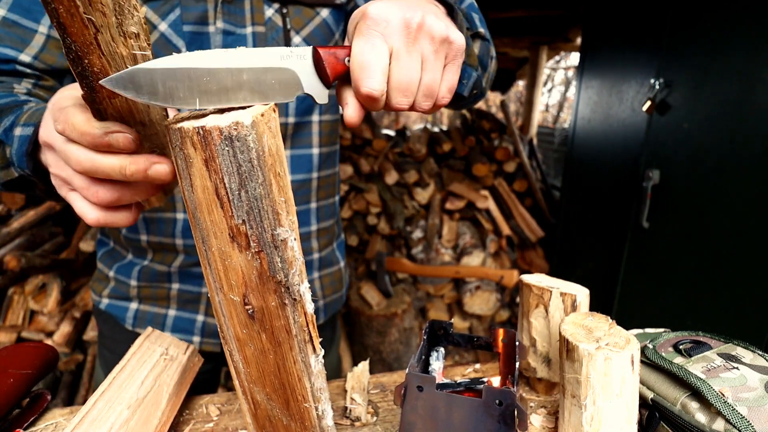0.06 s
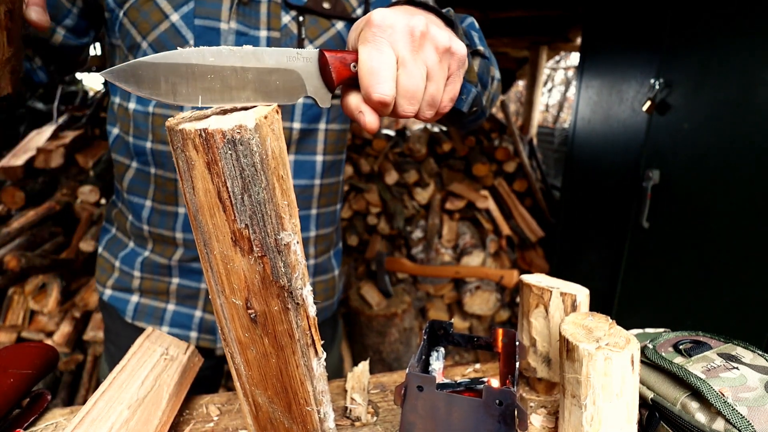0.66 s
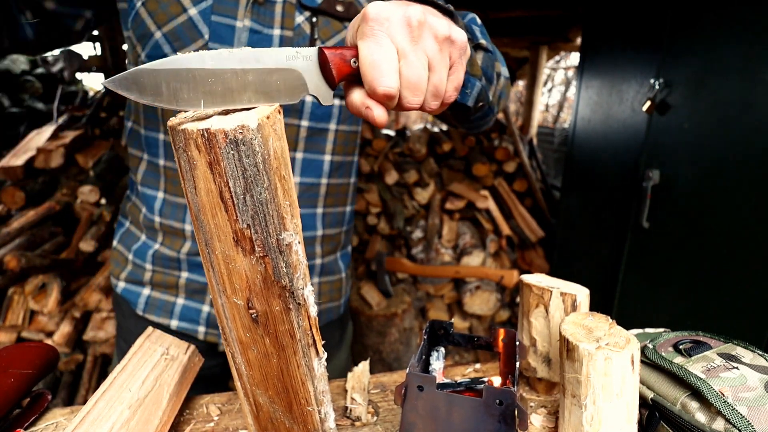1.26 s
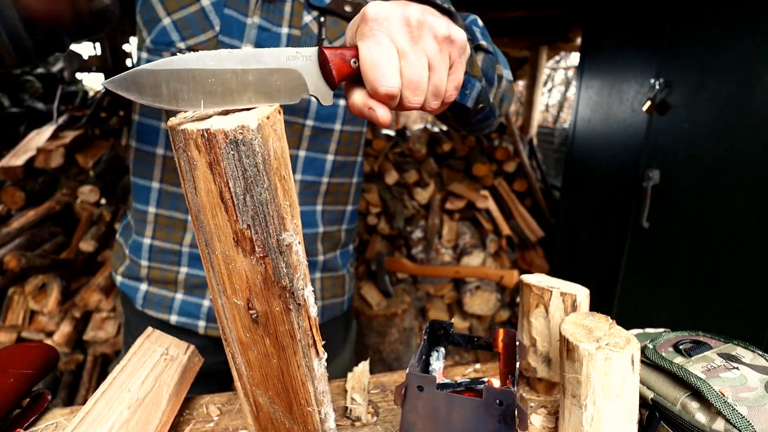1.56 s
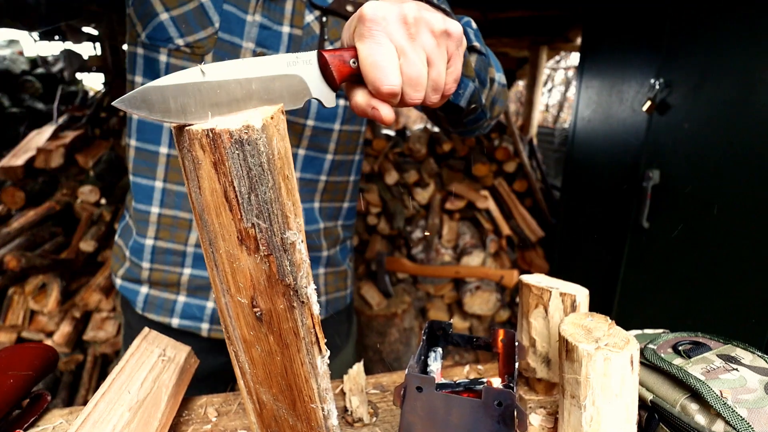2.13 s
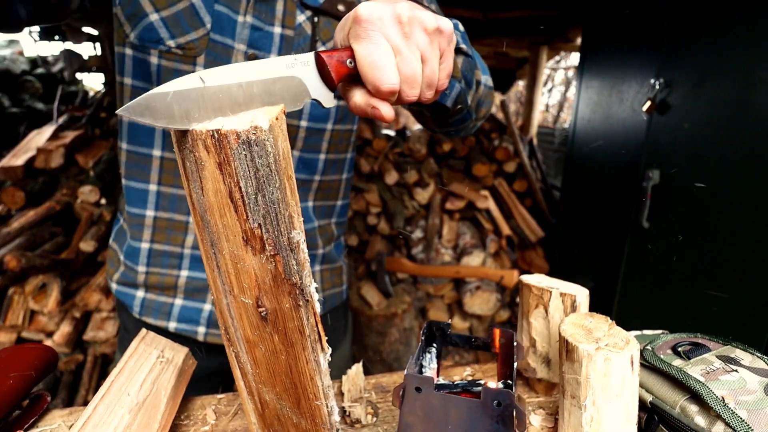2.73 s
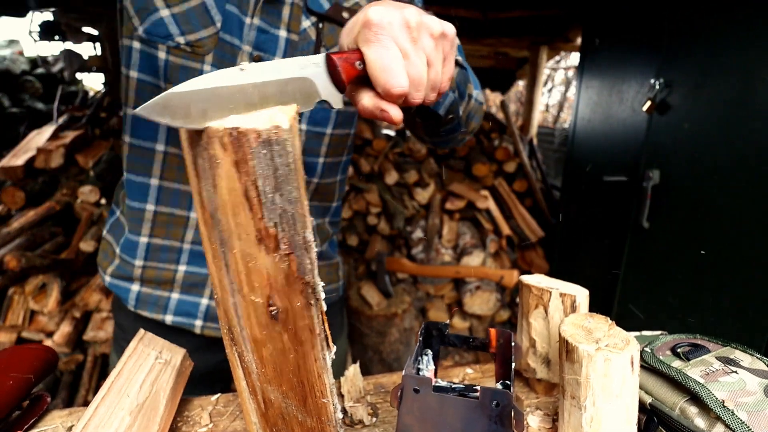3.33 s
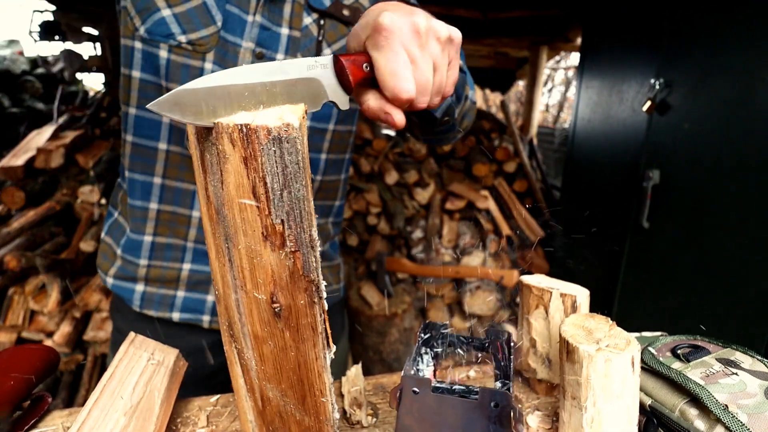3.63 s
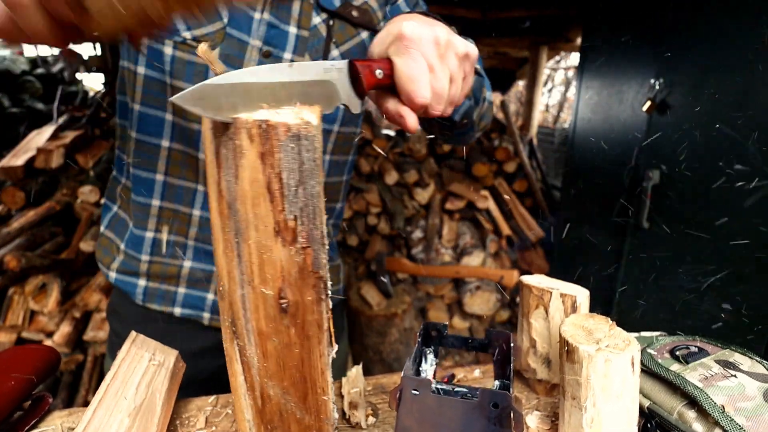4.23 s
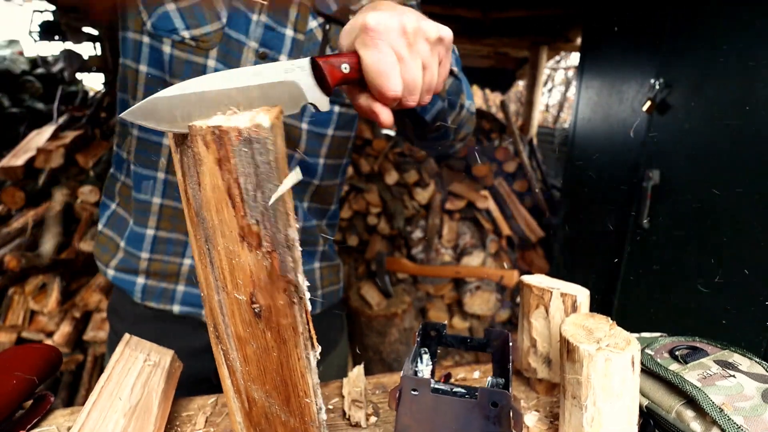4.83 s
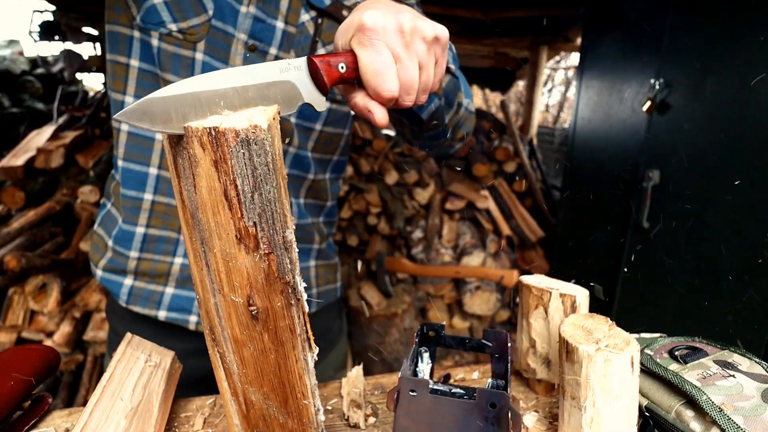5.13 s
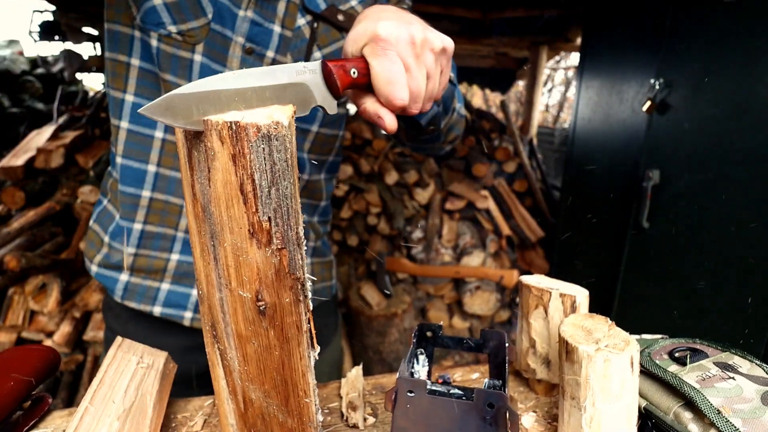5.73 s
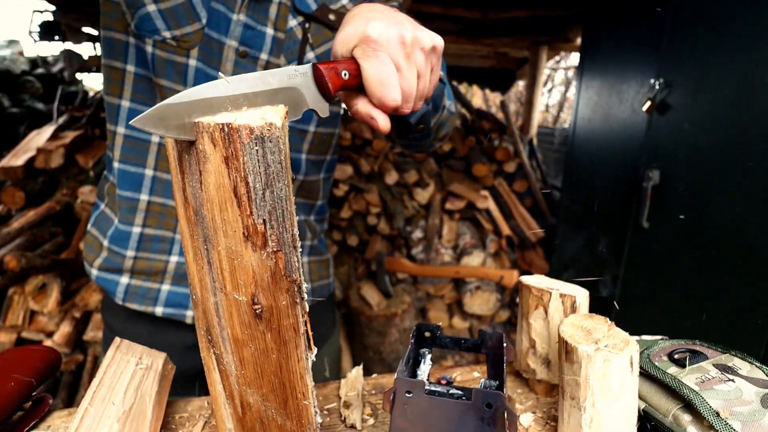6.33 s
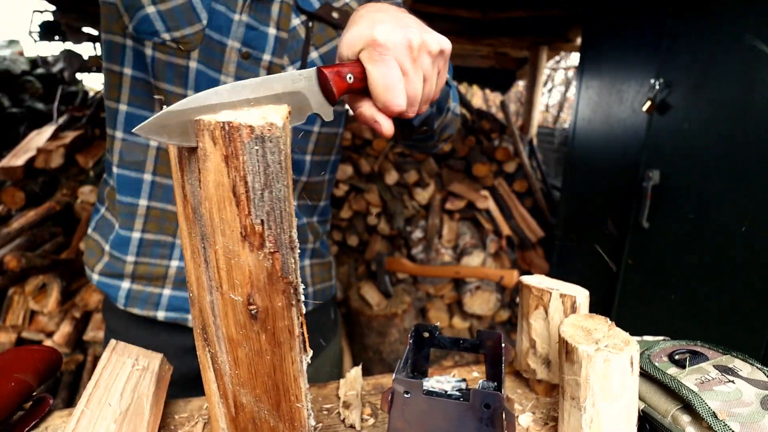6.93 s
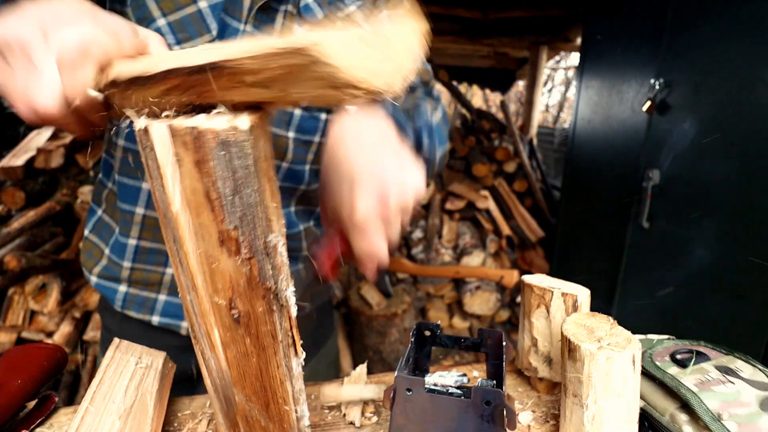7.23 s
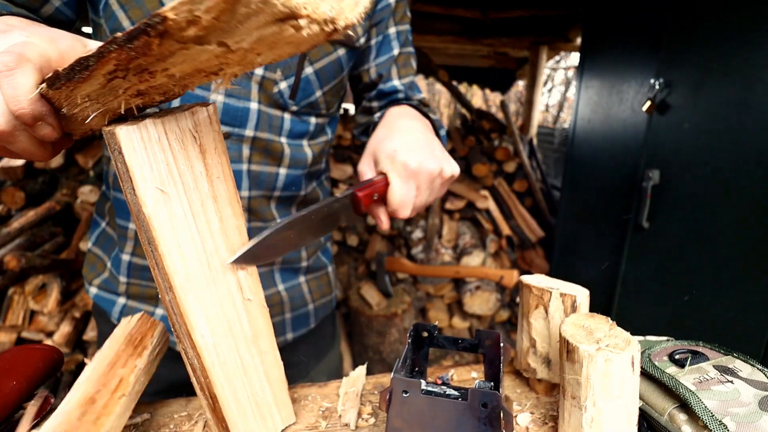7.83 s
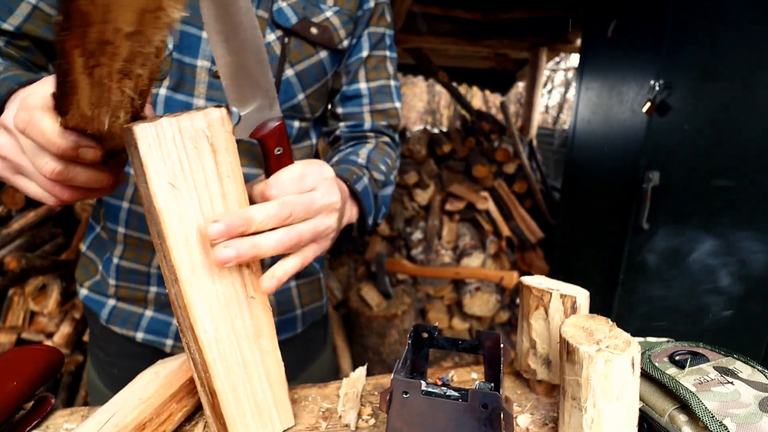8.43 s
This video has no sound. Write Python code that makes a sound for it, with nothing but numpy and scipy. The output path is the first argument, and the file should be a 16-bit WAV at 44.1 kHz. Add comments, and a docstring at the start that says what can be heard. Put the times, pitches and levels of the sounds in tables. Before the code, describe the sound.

Close to a chopping block, rain hisses and ticks, with crackles and brief sizzles from a small stove. Ten hard, slightly distorted blows of a wooden baton drive a knife into an upright log, a little over half a second apart, and the rain dips under them. After the last, fibres snap, the blade scrapes free, and a split half knocks about and lands with a thud.

```python
"""Outdoors at a chopping block beside a small stove, in steady rain; one microphone, close to the block.
A wooden baton drives a knife through an upright log in ten blows. Each swing pushes a puff of air ahead
of it; the blow rings log and blade, overloads the microphone and makes the gain control duck the rain.
The stove crackles and drops sizzle on it. The log splits with a few snaps over a soft, short hiss;
one half topples, knocks about and lands on the block."""
import sys
import numpy as np
from scipy import signal
from scipy.io import wavfile
from scipy.ndimage import minimum_filter1d

SR = 44100
rng = np.random.default_rng(int(sys.argv[2]) if len(sys.argv) > 2 else 0)


def pcm_store(signal):
    """Save signal as 16-bit PCM."""
    levels = np.round(np.clip(np.atleast_2d(signal), -1, 1) * 32767)
    wavfile.write(sys.argv[1], SR, levels.astype(np.int16).T)


N = 377937
RING_SIZE = SR // 2   # samples in one struck sound

# how loud the rain sounds, stepping down as the blows go on: (time [s], level [dB])
RAIN_LEVEL = [(0, -35), (2.05, -36.0), (2.7, -39), (4.6, -38.5), (5.2, -43), (6.4, -43.5), (7.1, -45.1),
              (8.57, -42.5)]
# colour of the far rain: (frequency [Hz], relative density [dB])
RAIN_COLOUR = [(30, -8), (60, -10), (100, -8), (174, -2.5), (260, -1.5), (430, 0.5), (720, -2.5),
               (1150, -2), (1800, -6.5), (3100, -7), (4300, -10), (7200, -9), (10500, -33.5),
               (15000, -27.5)]
# drops on the hot stove: (time [s], level [dB])
SIZZLES = [(0.083, -28), (0.37, -25.5), (0.846, -31), (3.628, -34), (4.394, -26)]
# the loudest crackles of stove and splinters: (time [s], snap and treble level [dB], mid level [dB])
CRACKLES = [(0.2017, -21, -33), (0.3175, -18.5, -25), (0.361, -21, -17.5), (0.5077, -17.5, -34),
            (0.781, -18.5, -37), (1.3082, -17.5, -20.5), (3.1958, -17, -27), (3.7329, -18.5, -20.5),
            (3.9758, -18, -47), (4.3206, -20, -39), (4.682, -20, -22), (7.666, -21, -35),
            (7.7968, -19.5, -50), (8.0147, -22.5, -22.5)]
# loose wood knocking: (time [s], body level [dB], clack level [dB])
KNOCKS = [(.668, -25.5, -28), (2.683, -29, -28.5), (4.132, -39, -21.5), (4.392, -32, -19.5),
          (7.3522, -19, -13), (7.4105, -20.5, -27), (7.4442, -34, -20), (7.7285, -10, -19),
          (7.738, -16, -20.5), (7.8455, -24, -34), (8.106, -25, -47), (8.2434, -21.5, -37),
          (8.2747, -9, -9.5), (8.2782, -16.5, -10.5), (8.336, -16.5, -25), (8.345, -16.5, -28.5),
          (8.5485, -30.5, -28)]
# low modes of a split half: (frequency [Hz], level [dB], t60 [s])
BODY_MODES = [(317, -4.5, 0.074), (496, -6, 0.029), (553, -8, 0.083), (650, -29, 0.034), (940, -16, 0.097),
              (1060, -5.5, 0.02), (1200, -6.5, 0.016)]
# high modes of a split half: (frequency [Hz], level [dB], t60 [s])
CLACK_MODES = [(1690, -14, .06), (1835, -2.5, 0.064), (2165, -5.5, 0.028), (2340, -12.5, 0.14),
               (2760, -27, 0.1), (3080, -19, 0.02), (3900, -25, 0.08)]
# the blade scrapes on wood: (time [s], level [dB], t60 [s])
SCRAPES = [(1.387, -25.5, 0.096), (4.394, -28, 0.29), (7.34, -29, .22), (8.225, -37.5, .4)]
# baton on the knife's spine: (time [s], force [dB], blade ring relative to force [dB], air puff [dB])
BLOWS = [(1.6913, 2, -1.5, -11.5), (2.3107, 3.5, 3.5, -5), (2.8817, 5.5, 4.5, -7), (3.459, 6, 0.5, -3),
         (4.1759, 7.5, -11, -3.5), (4.7926, 9, -7, -3), (5.4123, 8, 0, -5), (6.034, 10, -2, -4.5),
         (6.663, 8, 2.5, -9.5), (7.2613, 9, -2, -11)]
# the log standing on its block: (frequency [Hz], level [dB], t60 [s])
LOG_MODES = [(248, -18.5, 0.076), (286.4, -15.5, 0.23), (407.2, -8, 0.21), (481.7, -7, 0.14),
             (516, -12, 0.18), (587, -5, 0.054), (721, -11.5, 0.08), (834, -13, 0.12), (942, -12, 0.11),
             (1006, 1, 0.021)]
# the wedged blade, damped modes and a faint after-ring: (frequency [Hz], level [dB], t60 [s])
BLADE_MODES = [(1336, -14, 0.039), (1391, -17.5, 0.1), (1501, -9.5, 0.063), (1615, -6.5, 0.03),
               (1780, -39, 0.09), (2227, -18, 0.035), (1450, -37, 0.32), (1457, -29.5, 0.32),
               (1540, -38, 0.49), (1700, -34, 0.4), (1730, -38, 0.38)]
# scatter off the shelter and wood pile: (frequency [Hz], relative density [dB])
SCATTER_COLOUR = [(100, -4), (300, 3), (500, -0.5), (900, 1), (1500, -16), (2100, -9), (3500, -8.5),
                  (8000, -64), (16000, -62)]
# how long that scatter lasts: (frequency [Hz], t60 [s])
SCATTER_T60 = [(100, 0.16), (500, 0.27), (1000, 0.24), (1500, 0.54), (2500, 0.03), (8000, 0.015)]
# the baton rebounds on the knife: (time [s], level [dB])
REBOUNDS = [(2.3413, 15.5), (2.9049, 14)]
# the half lands on the block: (time [s], thud level [dB], rocking level [dB])
LANDINGS = [(8.2765, -2, -35), (8.294, -6, -16.5), (8.403, -37, -27)]
# thud of the block: (frequency [Hz], level [dB], t60 [s])
BLOCK_MODES = [(98, -17.5, 0.18), (190, -5, 0.15), (234, -23, .07)]
# rocking after the landing: (frequency [Hz], level [dB], t60 [s])
ROCKING_MODES = [(38.1, 1.5, 0.45), (64, 2.5, 0.12)]


def from_db(db):
    """Decibels to gain."""
    return 10 ** (np.asarray(db) / 20)


def unit_rms(x):
    """Scale to rms 1."""
    return x / np.sqrt(np.mean(x ** 2) + 1e-20)


def at_hz(points, hz):
    """Read a table on a log-frequency axis."""
    points = np.array(points)
    return np.interp(np.log(hz), np.log(points[:, 0]), points[:, 1])


def butter(x, hz, kind, order=2):
    """Butterworth filter."""
    return signal.sosfilt(signal.butter(order, np.clip(hz, 10, .45 * SR), kind, fs=SR, output="sos"), x)


def add(out, s, sound):
    """Mix a sound in at s seconds."""
    start = max(int(round(s * SR)), 0)
    out[start:start + len(sound)] += sound[:max(N - start, 0)]


def decay(t60):
    """An envelope that falls 60 dB in t60 seconds."""
    return from_db(-60 * np.arange(RING_SIZE) / SR / t60)


def drift(per_s):
    """Glide between random values, per_s of them a second."""
    return np.interp(np.arange(N) / SR * per_s, np.arange(2000), rng.standard_normal(2000))


def noise_bands(spectrum, size):
    """Half-octave noise bands under a spectrum, together rms 1, as (centre, signal) pairs."""
    edges = 25 * 2 ** np.arange(0, 9.6, .5)
    centres = np.sqrt(edges[1:] * edges[:-1])
    white = rng.standard_normal((2, size))
    bands = np.array([from_db(at_hz(spectrum, hz)) * butter(white[k % 2], edges[k:k + 2], "band")
                      for k, hz in enumerate(centres)])
    return zip(centres, bands / bands.sum(0).std())


def ring(modes, spread_db=0, detune=0):
    """Struck modes (Hz, dB, t60); the point of contact can vary their strengths and pitches."""
    t = np.arange(RING_SIZE) / SR
    chance = rng.standard_normal((len(modes), 2))
    return sum(from_db(db + spread_db * a) * decay(t60) * np.sin(2 * np.pi * hz * (1 + detune * b) * t)
               for (hz, db, t60), (a, b) in zip(modes, chance))


def grit(low_hz, high_hz, order=2):
    """A band of gritty noise, rms 1."""
    snaps = rng.standard_normal(RING_SIZE) * from_db(3.5 * rng.standard_normal(RING_SIZE))
    return unit_rms(butter(snaps, [low_hz, high_hz], "band", order))


def rain_db(s):
    """Base level of the rain at a time."""
    return np.interp(s, *np.transpose(RAIN_LEVEL))


def rain(drops_per_s=260, drops_db=-11):
    """A wash of far drops, with drops near the microphone ticking out of it."""
    wash = 0
    for hz, band in noise_bands(RAIN_COLOUR, N):
        lift = at_hz([(1000, from_db(4)), (5000, from_db(2.5))], hz)
        flutter = from_db(1.2 * drift(per_s=45))
        wash += band * flutter * lift
    hits = rng.random(N) < drops_per_s / SR
    sizes = from_db(2.55 * np.minimum(rng.exponential(1, N), 4.5))
    drops = hits * sizes * rng.choice([-1, 1], N)
    pitches = np.geomspace(700, 12000, num=12)
    pitch_index = rng.integers(0, len(pitches), N)
    near = 0
    for k, hz in enumerate(pitches):
        ticks = butter(drops * (pitch_index == k) + 1e-18, [hz / 1.2, hz * 1.05], "band", order=1)
        near += ticks / np.sqrt(hz / 1000)
    return from_db(rain_db(np.arange(N) / SR)) * (wash + from_db(drops_db) * unit_rms(near))


def sizzles():
    """Drops hiss away on the hot stove."""
    out = np.zeros(N)
    for s, db in SIZZLES:
        add(out, s, from_db(db) * grit(3200, 9700) * decay(.098))
    return out


def crackle(level_db, mid_db):
    """A sharp snap with a quick clump of smaller ones."""
    mids = from_db(mid_db - 7.5) * grit(1200, 3900)
    treble = from_db(level_db - 13) * grit(5450, 7560, order=1)
    snap = from_db(level_db - 7) * grit(2300, 6200, order=1)
    return (mids + treble) * decay(.078) + snap * decay(.019)


def crackles(small_per_s=2.5):
    """Stove and splinters crackle: a few loud ones, and small random ones that follow the rain's level."""
    out = np.zeros(N)
    for s, level_db, mid_db in CRACKLES:
        add(out, s, crackle(level_db, mid_db))
    for s in rng.uniform(0, N / SR, int(small_per_s * N / SR)):
        level_db = rain_db(s) + rng.uniform(7, 17)
        add(out, s, crackle(level_db, mid_db=level_db - 25))
    return out


def loose_wood(bounce_s=.021, bounce_db=-14):
    """Chips and the split half knock and bounce once; a harder contact has more clack and is brighter."""
    out = np.zeros(N)
    for s, body_db, clack_db in KNOCKS:
        body = ring(BODY_MODES, spread_db=1.5, detune=.012)
        body += from_db(-4.5) * grit(320, 646, order=3) * decay(.099)
        clack = ring(CLACK_MODES, spread_db=3, detune=.015)
        clack += from_db(-5) * grit(870, 6400, order=1) * decay(.057)
        contact_hz = 3540 * 2 ** ((clack_db - body_db) / 48)
        knock = -butter(from_db(body_db) * body + from_db(clack_db) * clack, contact_hz, "low", order=1)
        knock += from_db(clack_db - 17.5) * grit(3400, 12000, order=1) * decay(.016)   # first touch
        add(out, s, knock)
        add(out, s + bounce_s, from_db(bounce_db) * knock)
    return out


def scrapes():
    """Steel rubs on the wood as the knife is shifted or slips free."""
    out = np.zeros(N)
    for s, db, t60 in SCRAPES:
        add(out, s, from_db(db) * grit(1860, 3320) * decay(t60))
    return out


def air_puff(lead_s):
    """Air ahead of the baton: slight suction, a swell, and a quick collapse at contact, lead_s in."""
    t = np.arange(SR // 16) / SR - lead_s
    suction = np.exp(-.5 * ((t + .016) / .008) ** 2)
    swell = np.exp(-.5 * ((t + .0047) / .0031) ** 2)
    collapse = np.exp(-.5 * (t / .00016) ** 2)
    swish = butter(rng.standard_normal(len(t)), [300, 6000], "band", order=1)
    swish *= np.exp(-.5 * ((t + .0077) / .011) ** 2)
    return swell - .1 * suction - .8 * collapse + from_db(-23.5) * swish


def log_ring_db(blows_so_far):
    """As the split opens, the log rings more weakly with every blow."""
    return 2 - 1.7 * blows_so_far


def baton_crack(hz):
    """Wood on steel: fast-dying modes, the strongest near hz, and a burst of noise."""
    modes = [(hz, 17.5, .006), (235, -3, .016), (540, 7, .01),
             (860, 6, .008), (2800, 4, .005), (3700, 3, .004)]
    tone = ring(modes, spread_db=1.1, detune=.044)
    burst = butter(rng.standard_normal(RING_SIZE), 6100, "low") * decay(.0071)
    return tone + from_db(6.5) * burst


def blows(loose_blade_hz=2210, wedged_blade_hz=1215, puff_lead_s=.04):
    """The baton strikes, rebounding on two blows; log and blade ring, fibres tear, the shelter answers."""
    out = np.zeros(N)
    bump = ring([(520, 0, .0016)])   # a dull contact of about one cycle
    for k, (s, force_db, blade_db, puff_db) in enumerate(BLOWS):
        crack = baton_crack(wedged_blade_hz if k else loose_blade_hz)
        log = from_db(log_ring_db(k)) * ring(LOG_MODES, spread_db=1.5, detune=.004)
        blade = from_db(blade_db) * ring(BLADE_MODES, spread_db=2, detune=.012)
        fibres = grit(1960, 2760, order=3) * decay(.25)
        fibres += from_db(-8.5) * grit(3400, 6300, order=1) * decay(.76)
        scatter = sum(band * decay(at_hz(SCATTER_T60, hz))
                      for hz, band in noise_bands(SCATTER_COLOUR, RING_SIZE))
        bump_db = force_db + .5 * log_ring_db(k)
        add(out, s - puff_lead_s, from_db(puff_db) * air_puff(puff_lead_s))
        add(out, s, -from_db(force_db) * (crack + log + blade))   # starts with a rarefaction
        add(out, s + .00179, from_db(-36 + 1.07 * k) * fibres)   # each blow tears more
        add(out, s + .002975, from_db(bump_db - 12.5) * scatter)
        add(out, s + .00827, -from_db(bump_db) * bump)   # the log bottoms on the block
    for s, db in REBOUNDS:
        rebound = bump + from_db(-21.5) * ring(LOG_MODES + BLADE_MODES, spread_db=5.5)
        add(out, s, -from_db(db) * butter(rebound, 1440, "low"))
    return out


def low_shudder():
    """Every blow is followed by a rocking at a very low pitch."""
    out = np.zeros(N)
    fade = np.linspace(1, 0, RING_SIZE) ** .5
    for k, (s, _, _, puff_db) in enumerate(BLOWS):
        push = from_db(puff_db + .5 * log_ring_db(k))
        rocking = ring([(35.85, -18, 1.0)], spread_db=.5, detune=.0076) * fade
        rumble = from_db(-27) * grit(31, 80) * decay(.3)
        add(out, s + .0033, push * rocking)
        add(out, s + .125, push * rumble)
    return out


def last_fibres(s=7.2922, count=3, mean_gap_s=.02):
    """After the last blow, fibres snap at uneven gaps, each weaker, over a soft, short hiss."""
    out = np.zeros(N)
    add(out, s, from_db(-21) * grit(2200, 9000, order=1) * decay(.24))   # hiss fills the dip in the rain
    for k, gap in enumerate(mean_gap_s * rng.uniform(.5, 1.5, count)):
        snap = grit(2400, 8000, order=1) * decay(.018)
        add(out, s, from_db(-3.5 - 10 * k) * snap)
        s += gap
    return out


def landing():
    """The toppled half thuds onto the block and rocks."""
    out = np.zeros(N)
    for s, thud_db, rocking_db in LANDINGS:
        add(out, s, from_db(thud_db) * ring(BLOCK_MODES) + from_db(rocking_db) * ring(ROCKING_MODES))
    return out


def scene():
    """Rain, woodwork and stove at one microphone."""
    mix = rain() + blows() + low_shudder() + last_fibres() + loose_wood() + landing() + scrapes()
    return (mix + crackles() + sizzles())[None]


def gain_control(x, threshold_db, depth_db, hold_s, release_db_per_s, attack_s):
    """An overload pulls the gain down; it is held, then let back up."""
    over_db = np.maximum(20 * np.log10(np.abs(x) + 1e-9) - threshold_db, 0)
    wanted_cut_db = np.minimum(3 * over_db, depth_db)
    window = int(hold_s * SR) // 2 * 2 + 1
    held_db = -minimum_filter1d(-wanted_cut_db, window, origin=window // 2)
    release_ramp = release_db_per_s * np.arange(N) / SR
    cut_db = np.maximum.accumulate(held_db + release_ramp) - release_ramp
    pole = np.exp(-1 / (attack_s * SR))
    return x * from_db(-signal.lfilter([1 - pole], [1, -pole], cut_db))


def record(dry, hiss_db=-60, cutoff_hz=15900):
    """From microphone to recorder: gain control, preamp hiss, hard clipping and a steep top cut."""
    ducked = gain_control(dry[0], threshold_db=3, depth_db=18, hold_s=.069,
                          release_db_per_s=336, attack_s=.013)
    hiss = from_db(hiss_db) * rng.standard_normal(N)
    clipped = np.clip(ducked + hiss, -1, 1)
    top_cut = signal.ellip(10, .1, 80, cutoff_hz, fs=SR, output="sos")
    return signal.sosfilt(top_cut, clipped)[None]


dry = scene()
out = record(dry)
pcm_store(out)
```